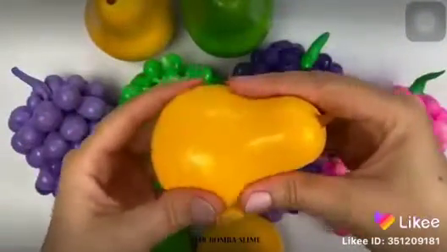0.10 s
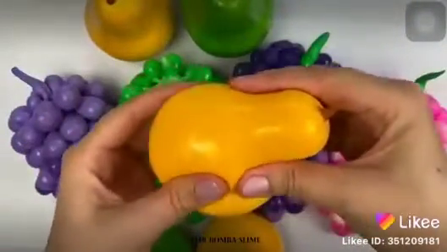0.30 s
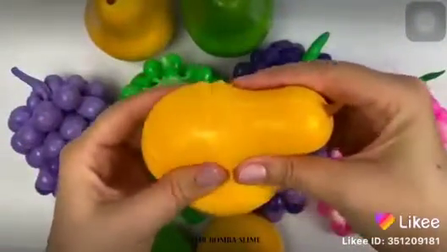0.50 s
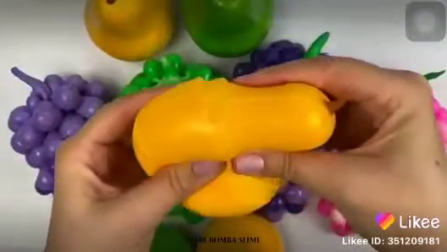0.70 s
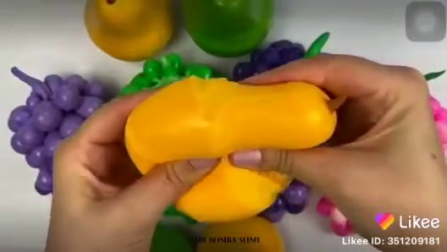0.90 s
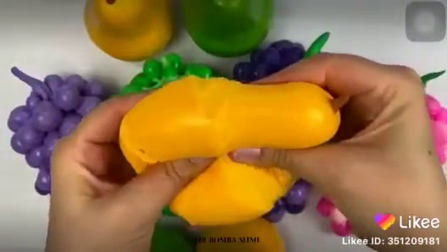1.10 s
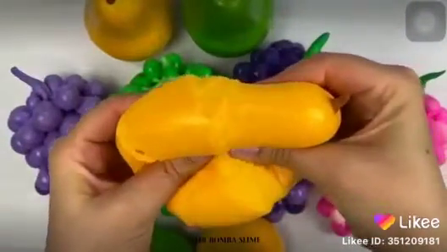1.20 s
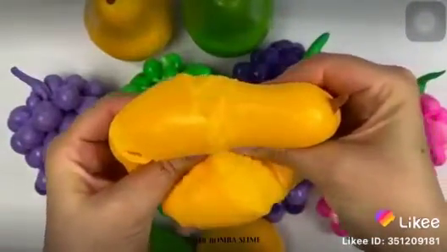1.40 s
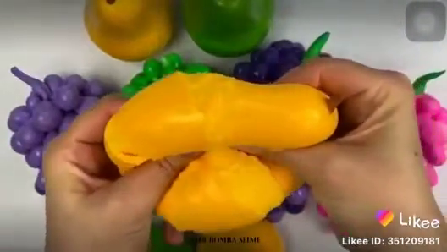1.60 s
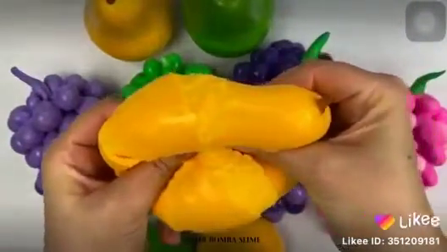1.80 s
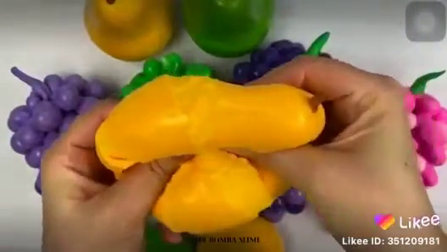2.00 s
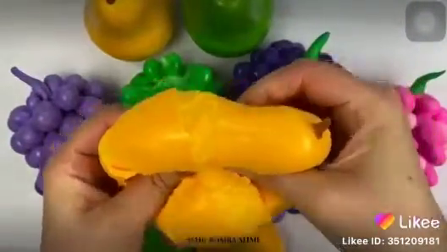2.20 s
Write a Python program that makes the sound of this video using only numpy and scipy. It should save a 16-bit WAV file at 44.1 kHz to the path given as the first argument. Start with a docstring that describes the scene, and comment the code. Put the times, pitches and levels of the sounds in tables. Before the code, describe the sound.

Crunchy cracking of a hollow dry clay shell squeezed in two hands, dense then thinning out

```python
"""Two hands crush a hollow shell of hard clay, close to the microphone in a small room.
Over a low rumble and hiss the crust snaps in quick runs: noise bursts coloured by a plate resonance.
The shell rings on, crumbs and chips grind as dense filtered clicks, and dull noise thuds mark the caving in.
Thin flakes tick off brightly and soft air puffs pass; after a rest the clay crackles faintly again.
The loudest cracks overload the microphone, which flattens their peaks."""
import sys
import numpy as np
from scipy import signal
from scipy.fft import rfft, irfft, next_fast_len
from scipy.io import wavfile

SR = 44100
rng = np.random.default_rng(int(sys.argv[2]) if len(sys.argv) > 2 else 0)


def persist_wave(psi):
    """Save psi, clipped to +-1, as 16-bit WAV."""
    counts = np.round(np.clip(psi, -1, 1) * 32767).astype(np.int16)
    wavfile.write(sys.argv[1], SR, np.atleast_2d(counts).T)


N = 99225
CUTOFF_HZ = 15850   # top of the microphone's band

# Level of the grinding crumbs, which the chips follow: (t/s, level/dB)
GRINDING_LEVEL = [(.2, -92), (.23, -44), (.53, -27.5), (.6, -34.5), (.76, -38), (.93, -33.5), (1.17, -41),
                  (1.34, -42.5), (1.44, -42), (1.58, -41.5), (1.76, -48), (1.84, -70), (2.07, -41),
                  (2.25, -53)]


def from_db(db):
    """Decibels to gain."""
    return 10 ** (np.asarray(db) / 20)


def rms_one(x):
    """Scale to rms 1."""
    return x / np.sqrt(np.mean(x ** 2) + 1e-20)


def gain_curve(rows):
    """Gain at every sample, interpolated in dB from (t/s, level/dB) rows."""
    times, levels = np.transpose(rows)
    return from_db(np.interp(np.arange(N) / SR, times, levels))


def coloured(x, points):
    """Causal (minimum-phase) filter through (f/Hz, level/dB) points, built from the folded cepstrum."""
    size = 2 * next_fast_len(len(x))
    hz, db = np.transpose(points)
    grid = np.maximum(np.arange(size // 2 + 1) * SR / size, 1)
    gain = from_db(np.interp(np.log(grid), np.log(hz), db))
    cepstrum = irfft(np.log(gain))
    cepstrum[1:size // 2] *= 2
    cepstrum[size // 2 + 1:] = 0
    response = np.exp(rfft(cepstrum))
    return irfft(rfft(x, size) * response)[:len(x)]


def resonance(x, hz, width_hz):
    """One two-pole resonance with gain close to 1 at its peak."""
    r = np.exp(-np.pi * width_hz / SR)
    zeros = np.array([1, 0, -1]) * (1 - r * r) / 2
    poles = [1, -2 * r * np.cos(2 * np.pi * hz / SR), r * r]
    return signal.lfilter(zeros, poles, x + 1e-18)


def air():
    """Steady rumble and hiss, with soft bell-shaped swells of pressure as the hands push air."""
    # Centres of the air puffs from the hands: (t/s)
    puff_times = [0.746, 1.176, 1.591, 2.017]
    # Colour of the room rumble and hiss: (f/Hz, level/dB)
    floor_colour = [(20, 5.5), (60, -8), (115, -3), (200, -14.5), (1000, -25.5), (3000, -35.5),
                    (15500, -35.5)]
    puff_s, puff_db, floor_db = 0.0096, -26.5, -43.5
    t = np.arange(N) / SR
    puffs = sum(np.exp(-.5 * ((t - s) / puff_s) ** 2) for s in puff_times)
    floor = rms_one(coloured(rng.standard_normal(N), floor_colour))
    return from_db(puff_db) * puffs + from_db(floor_db) * floor


def crack(s, db, treble_db, plate_hz, size=2048, jump_count=12, facet_count=16):
    """The clay snaps and splinters, coloured by the plate that gives way and by its ragged edge."""
    # Colour of the breaking crust: (f/Hz, level/dB)
    crust_colour = [(100, -6.5), (300, -10.5), (520, -7.5), (680, -6), (1350, -0.5), (2200, 0),
                    (3200, -3.5), (5000, -3), (7300, 2.5), (10500, -8), (15500, -9.5)]
    snap_s, doubling_db, medium_db = 0.0015, 16.5, -10.5   # stronger cracks run longer
    first_break = 1.58   # opening pulse, relative to the rms of the noise
    splinter_s, splinter_db, splinter_spread_db = 0.0092, -12, 9
    halving_s = 1.15   # cracks get shorter as the pieces get smaller
    plate_q = 5.4   # each plate rings briefly at its own pitch
    split_hz, facet_spread_db = 4230, 2.5   # every broken edge has its own uneven treble

    t = np.arange(size) / SR
    snap_decay = snap_s * 2 ** ((db - medium_db) / doubling_db - s / halving_s)
    splinter_decay = splinter_s * 2 ** (-s / halving_s)
    grain = rng.standard_normal(size)
    snap = grain * np.exp(-t / snap_decay)
    snap[0] = first_break

    # the splintering jumps to a new level every few samples
    jumps = np.repeat(np.clip(rng.standard_normal(size), -2, 2), jump_count)[:size]
    splinters = rms_one(grain * from_db(splinter_spread_db * jumps))
    force = snap + from_db(splinter_db) * splinters * np.exp(-t / splinter_decay)
    plate = resonance(force, plate_hz, plate_hz / plate_q)
    sound = coloured(force + plate, crust_colour)

    low = signal.butter(3, split_hz, "low", fs=SR, output="sos")
    high = signal.butter(3, split_hz, "high", fs=SR, output="sos")
    body, treble = signal.sosfilt(low, sound), signal.sosfilt(high, sound)
    facet_hz = np.linspace(split_hz, CUTOFF_HZ, facet_count)
    facets = np.c_[facet_hz, facet_spread_db * rng.standard_normal(facet_count)]
    sound = rms_one(body) + from_db(treble_db) * rms_one(coloured(treble, facets))
    opening = t < .003   # the strength is set over the first 3 ms
    return from_db(db) * sound / np.std(sound[opening])


def cracks(rows):
    """Place each crack of the broken clay at its moment."""
    out = np.zeros(N + SR)
    for s, db, treble_db, plate_hz in rows:
        sound = crack(s, db, treble_db, plate_hz)
        start = int(s * SR)
        out[start:start + len(sound)] += sound
    return out[:N]


def shell(breaking):
    """The hollow shell is struck by the breaking and rings in its modes, less as it caves in."""
    # Ringing modes of the shell: (f/Hz, level/dB)
    modes = [(305, -0.5), (626, 7), (710, 7.5), (797, 0.5), (1040, -4.5), (1306, -2)]
    # How hard the breaking drives the ringing: (t/s, level/dB)
    hollowness = [(.25, 4), (1.3, -17.5), (2.2, -62)]
    t60_s = .11
    width_hz = np.log(1000) / (np.pi * t60_s)
    drive = breaking * gain_curve(hollowness)
    return sum(from_db(db) * resonance(drive, hz, width_hz) for hz, db in modes)


def room(x):
    """A short diffuse tail from the table and walls: convolution with decaying noise."""
    # Colour of the room's tail: (f/Hz, level/dB)
    tail_colour = [(500, -4.5), (2300, -3.5), (4000, -4), (15500, -1.5)]
    t60_s, room_db, delay_s = 0.13, -14, 0.00425
    t = np.arange(SR // 2) / SR
    decay = from_db(-60 * t / t60_s) * (t > delay_s)
    tail = coloured(rng.standard_normal(len(t)) * decay, tail_colour)
    tail = tail / np.linalg.norm(tail)
    return from_db(room_db) * signal.fftconvolve(x, tail)[:N]


def chips(count=80):
    """Small cracks at random moments, their strength following the grinding around them."""
    over_grinding_db, spread_db, middle_hz = 10.5, 1.5, 2200
    s = rng.uniform(GRINDING_LEVEL[0][0], N / SR, count)
    strength, brightness, pitch = rng.standard_normal((3, count))
    grinding_db = np.interp(s, *np.transpose(GRINDING_LEVEL))
    db = grinding_db + over_grinding_db + spread_db * strength
    plate_hz = middle_hz * 2 ** (.5 * pitch)   # pitch scatters by half an octave
    return cracks(zip(s, db, spread_db * brightness, plate_hz))


def crumbs(count=12):
    """Broken edges grind: dense tiny clicks of uneven size, dealt at random to a set of pitches."""
    # Colour of the crumbs: (f/Hz, level/dB)
    crumb_colour = [(200, -10.5), (2000, 3), (4200, -5.5), (7500, -2.5), (10500, -3.5), (15500, -2.5)]
    crumbs_per_s, spread_db = 3100, 1
    low_hz, high_hz, crumb_q = 900, 12900, 0.75
    size_db = spread_db * np.minimum(rng.exponential(1, N), 5)
    sizes = from_db(size_db) * rng.choice([-1, 1], N)
    clicks = sizes * (rng.random(N) < crumbs_per_s / SR)
    dealt = rng.integers(0, count, N)
    pitches = np.geomspace(low_hz, high_hz, count)
    grains = sum(resonance(clicks * (dealt == k), hz, hz / crumb_q) for k, hz in enumerate(pitches))
    return gain_curve(GRINDING_LEVEL) * rms_one(coloured(grains, crumb_colour))


def thuds():
    """The wall gives way with dull, quickly dying bursts of low resonant noise."""
    # Thuds of the caving shell, level ahead of the last resonance: (t/s, level/dB)
    thud_events = [(0.2173, -20), (0.2597, -11), (0.81, -21.5), (0.971, -26), (1.093, -29.5)]
    thud_hz, width_hz, decay_s = 131, 325, 0.012
    t = np.arange(N) / SR
    envelope = sum(from_db(db) * (t > s) * np.exp(-np.abs(t - s) / decay_s) for s, db in thud_events)
    rumble = rms_one(resonance(rng.standard_normal(N), thud_hz, width_hz))
    return resonance(envelope * rumble, thud_hz, 2 * width_hz)   # softens the onsets


def flakes(size=256):
    """Thin flakes chip off: each a dry, bright noise tick ringing at a high pitch of its own."""
    # Ticks of the flakes: (t/s, peak level/dB)
    flake_events = [(.438, -15), (.6055, -13), (.6749, -15), (.8947, -14), (1.0252, -24), (1.0703, -3),
                    (1.1862, -11), (1.5069, -12.5), (1.544, -17), (1.577, -8)]
    middle_hz, flake_q, decay_s = 8400, 1.3, .0004
    out = np.zeros(N + size)
    t = np.arange(size) / SR
    for s, db in flake_events:
        hz = middle_hz * 2 ** (rng.random() - .5)   # within half an octave either way
        burst = rng.standard_normal(size) * np.exp(-t / decay_s)
        tick = resonance(burst, hz, hz / flake_q)
        start = int(s * SR)
        out[start:start + size] += from_db(db) * tick / np.abs(tick).max()
    return out[:N]


def scene():
    """The breaking crust, its ringing shell and the room."""
    # Cracks in the crust: (t/s, strength level/dB, treble over body level/dB, breaking plate f/Hz)
    crust_cracks = [(0.1743, -26, 11.5, 2390), (0.2183, -3, -8, 1290), (0.2235, -8, -8, 1140),
                    (0.2434, -14, 1, 3280), (0.2605, -2.5, -27, 1030), (0.2655, -7.5, -5, 663),
                    (0.2723, 2.5, -3.5, 1820), (0.2835, 1.5, -3, 1880), (0.2959, -15, 8, 1830),
                    (0.303, -9.5, -2, 800), (0.3258, -16.5, -4, 1530), (0.3477, -9.5, -5, 1940),
                    (0.3618, -15, 17, 2000), (0.3757, -10, -12, 2100), (0.3962, -15, 4, 2200),
                    (0.4015, -9.5, -2, 1810), (0.4079, -2, -9.5, 2200), (0.4238, -10, 0, 1580),
                    (0.4493, -16, 2, 3070), (0.4596, -21, -8, 2400), (0.4694, -5.5, -3, 2070),
                    (0.4831, -13, 2, 2150), (0.4975, -8, 11, 3050), (0.5128, -3, -9, 1860),
                    (0.5251, 3.5, 2.5, 1860), (0.53, -8, -14, 1840), (0.5449, -4.5, 5, 2230),
                    (0.5606, -11, -1.5, 2950), (0.568, -8.5, -1, 1300), (0.6188, -6.5, -4.5, 2150),
                    (0.6293, -6, 0.5, 1900), (0.6455, -6.5, -1, 2200), (0.663, -24, -9, 1660),
                    (0.6862, -9, 0, 1450), (0.6951, -9, 7, 3460), (0.7266, -14, -7, 1550),
                    (0.7323, -6.5, 0.5, 2200), (0.7415, -4, -2, 930), (0.7571, -15.5, 6, 3030),
                    (0.7763, -12, -2, 1730), (0.7976, -8, -0.5, 1430), (0.8105, -4, -3, 1350),
                    (0.8332, -4, -2, 1340), (0.8379, -5.5, -4.5, 1350), (0.8738, -12, 0, 2200),
                    (0.8989, -17.5, -1, 1350), (0.9061, -5.5, 0.5, 2030), (0.91, -2.5, -5, 1450),
                    (0.9283, -10, -11, 1430), (0.9393, -9, -1, 1340), (0.9584, -17.5, -6, 2020),
                    (0.9729, 1, -8, 2100), (0.98, -12, 2, 2250), (1.0023, -20, -9.5, 3730),
                    (1.0132, -24, -19, 1370), (1.036, -25.5, -26, 1120), (1.0522, -18.5, -17, 1600),
                    (1.0814, -27, -5, 1550), (1.0913, -7, -0.5, 1270), (1.1202, -24, 2, 3700),
                    (1.1278, -17, -3, 2320), (1.2135, -15.5, -0.5, 1920), (1.2407, -8.5, -12, 2630),
                    (1.246, -14, -1, 2510), (1.2701, -6, -5, 3080), (1.2974, -8, -5.5, 2140),
                    (1.3285, -13.5, -10, 2830), (1.3417, -25, -15, 1900), (1.3523, -2.5, -6, 2280),
                    (1.3734, -32, 5, 2320), (1.4026, -7, 1.5, 2440), (1.4582, -21.5, 2.5, 1310),
                    (1.4758, -6.5, -13.5, 2310), (1.5372, -24, -9, 2400), (1.5511, -10.5, -6.5, 2410),
                    (1.5626, -11.5, -5.5, 2640), (1.5812, -14.5, -9, 2220), (1.6038, -17, 20, 2340),
                    (1.6731, -25.5, 7, 2780), (1.7283, -18, -16, 850), (1.9264, -42.5, -13, 2000),
                    (1.9641, -31, -9, 1300), (2.0072, -37, -3, 2000), (2.0735, -28, -20, 2970),
                    (2.0971, -27.5, -6, 1950), (2.1188, -27.5, -5, 1850), (2.164, -29.5, -4, 1240)]
    breaking = cracks(crust_cracks) + flakes() + chips() + crumbs()
    clay = breaking + shell(breaking) + thuds()
    return (clay + room(clay) + air())[None]


def record(dry):
    """Overload flattens the loud cracks in the microphone, then a steep low-pass cuts the top."""
    ceiling, knee = 0.28, 6.7   # a higher knee bends more abruptly
    flattened = dry / (1 + np.abs(dry / ceiling) ** knee) ** (1 / knee)
    low_pass = signal.ellip(10, .1, 80, CUTOFF_HZ, fs=SR, output="sos")
    return signal.sosfilt(low_pass, flattened)


dry = scene()
out = record(dry)
persist_wave(out)
```